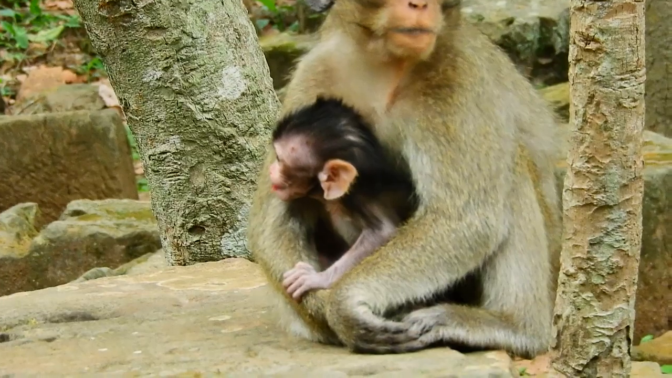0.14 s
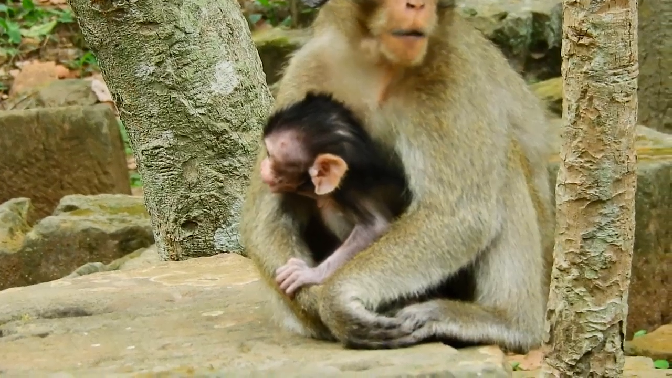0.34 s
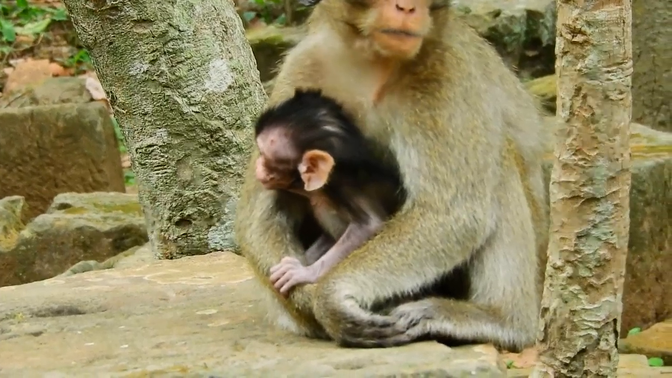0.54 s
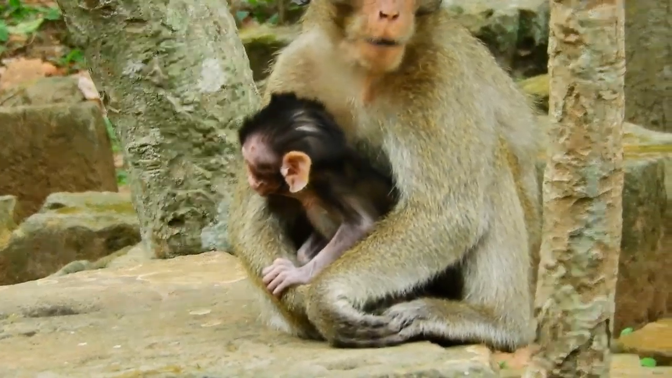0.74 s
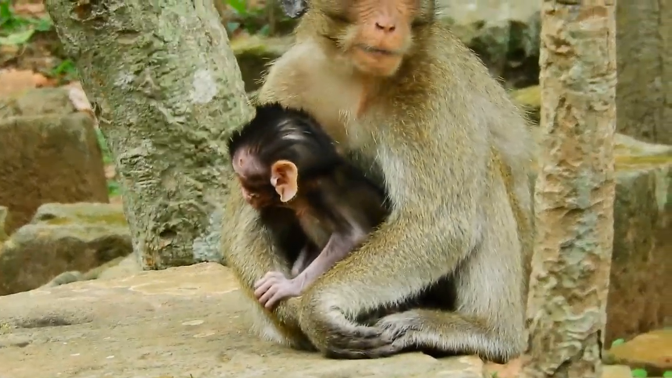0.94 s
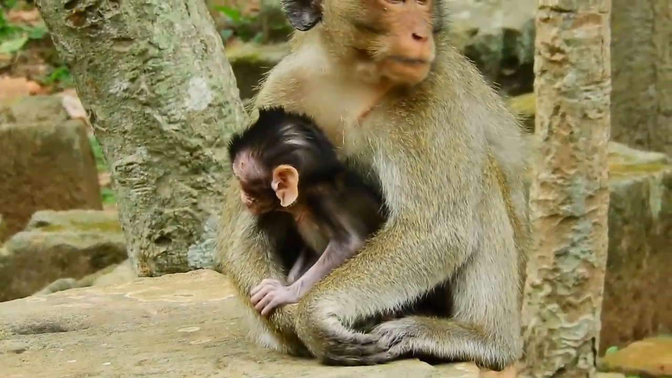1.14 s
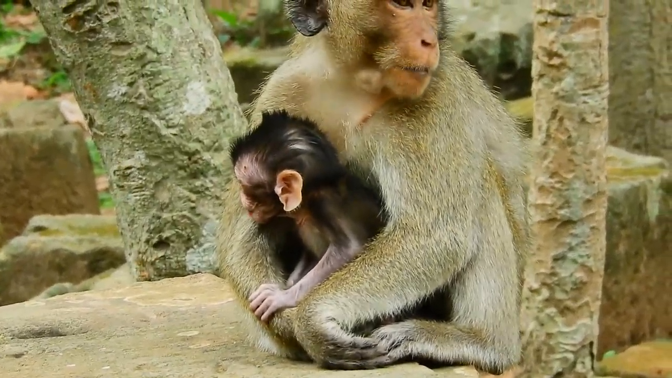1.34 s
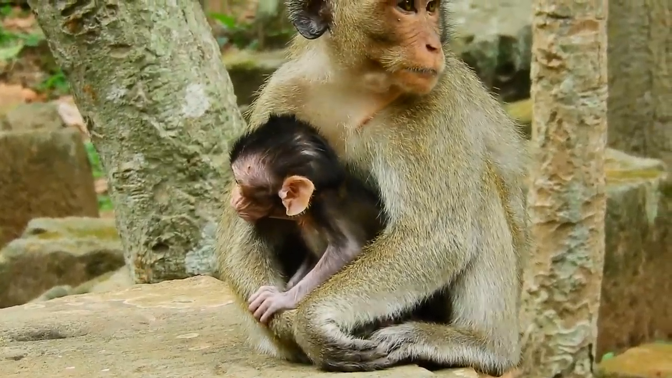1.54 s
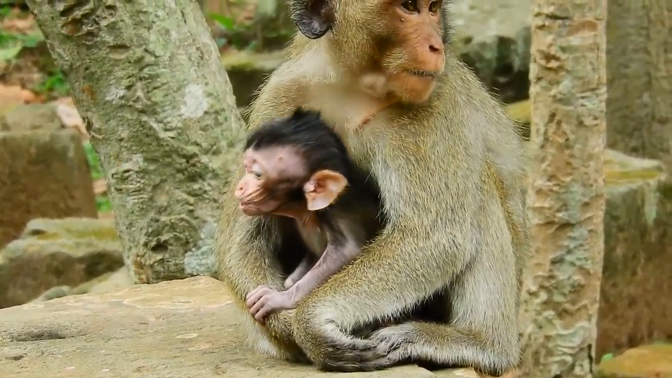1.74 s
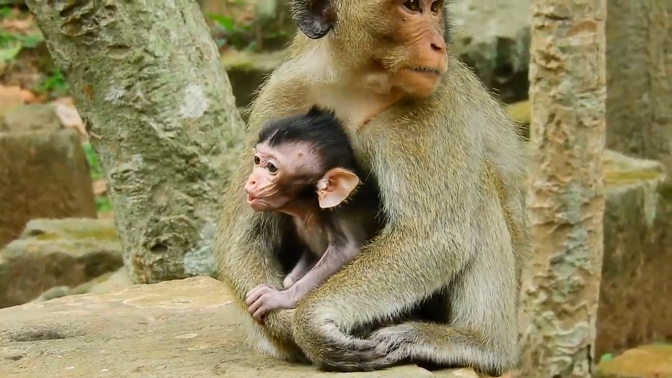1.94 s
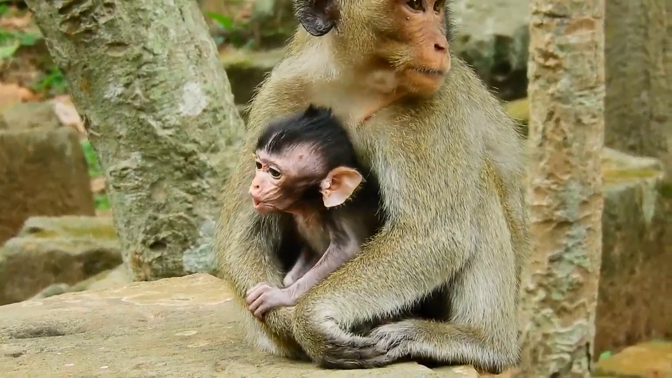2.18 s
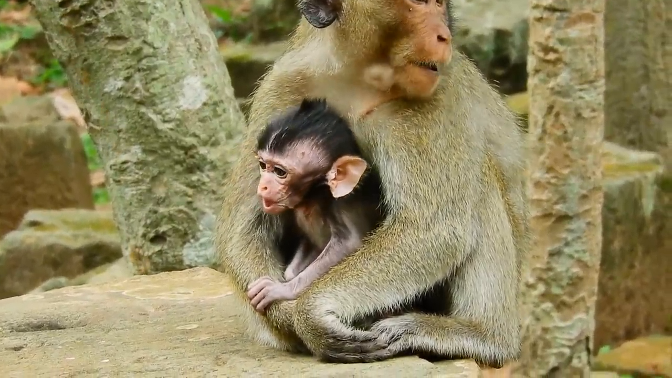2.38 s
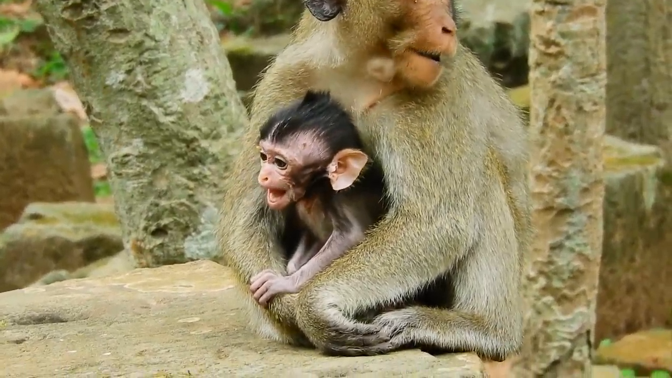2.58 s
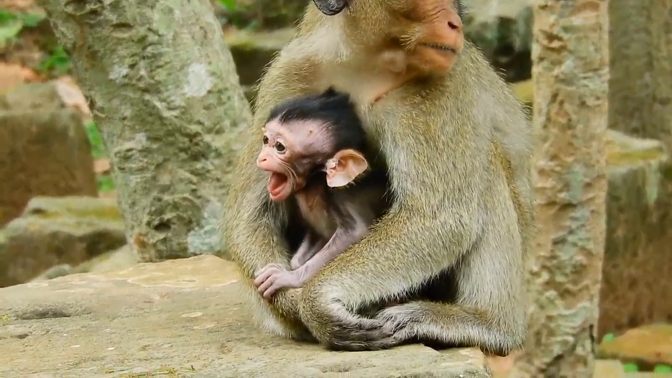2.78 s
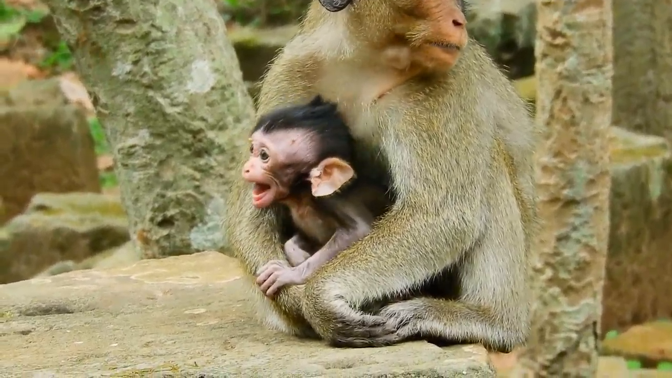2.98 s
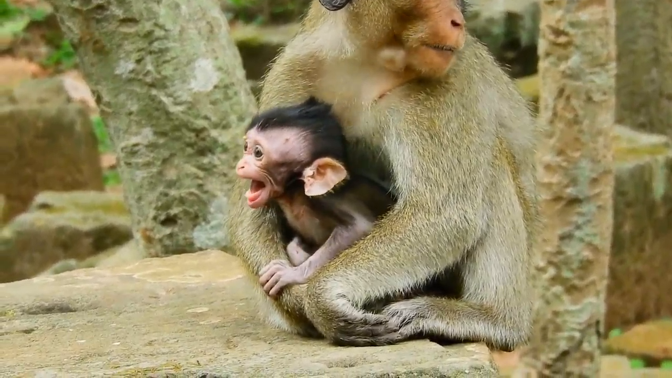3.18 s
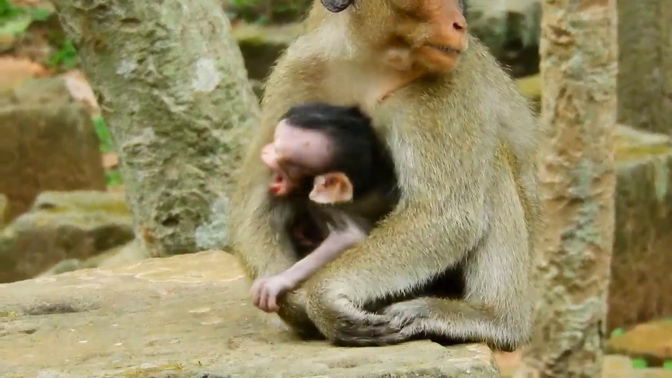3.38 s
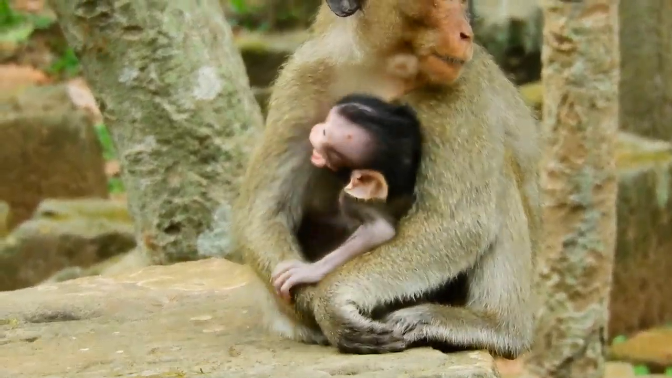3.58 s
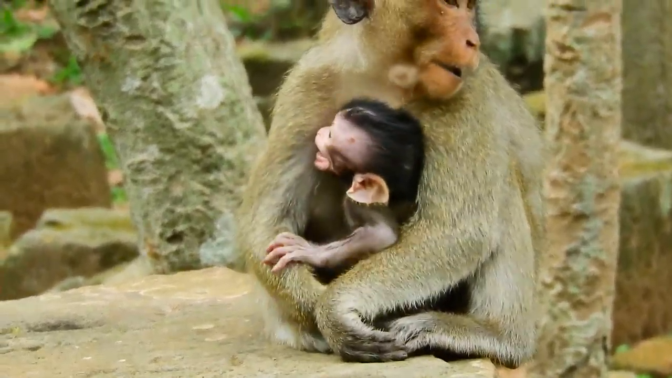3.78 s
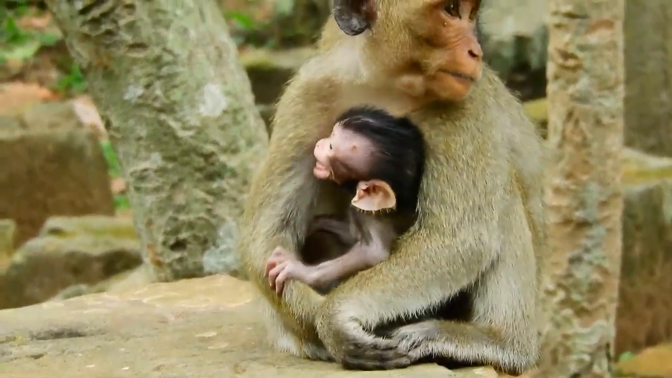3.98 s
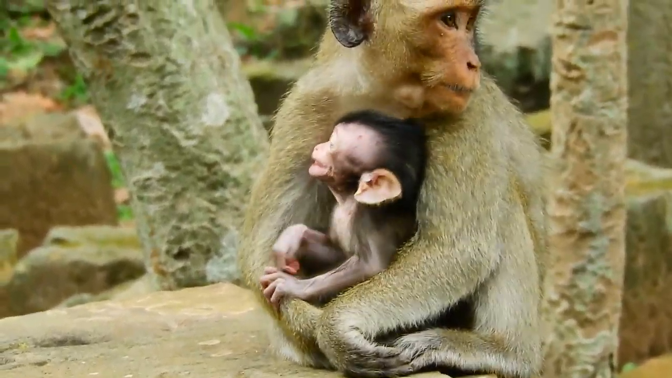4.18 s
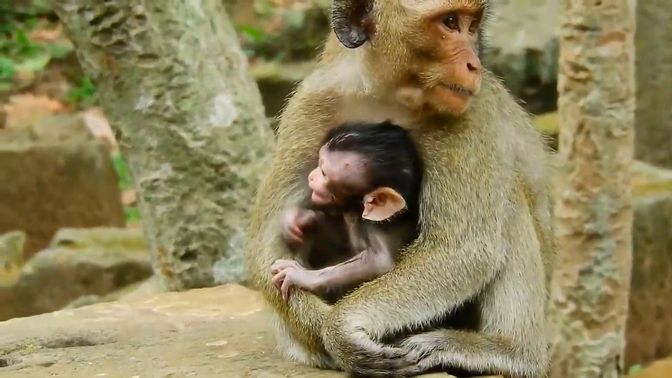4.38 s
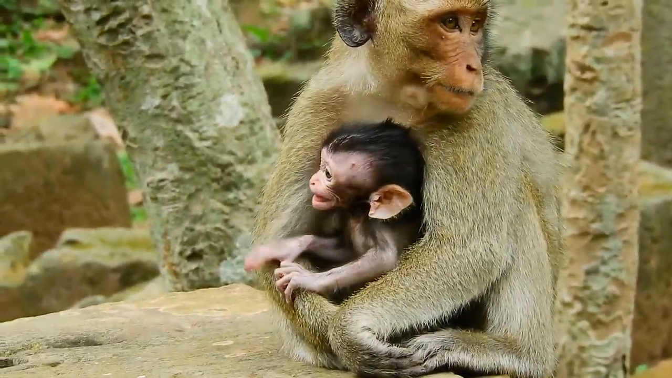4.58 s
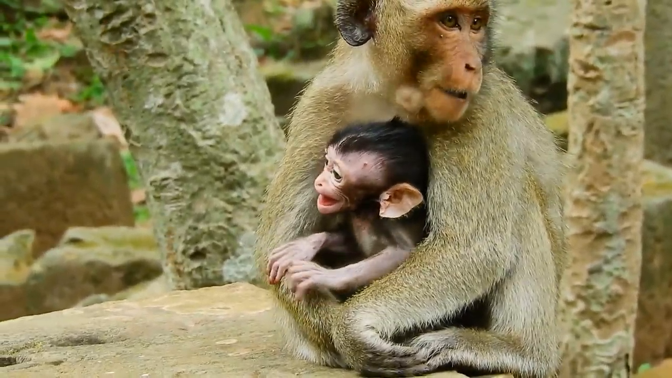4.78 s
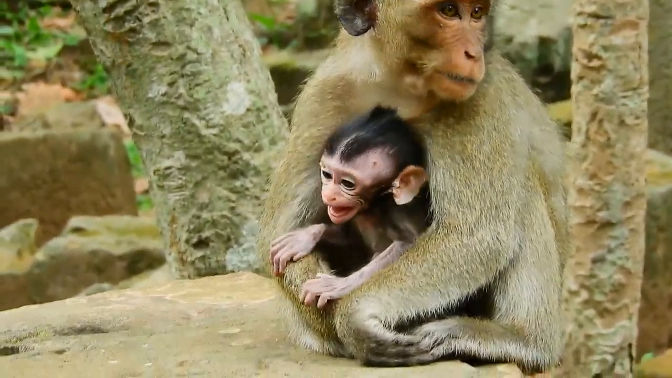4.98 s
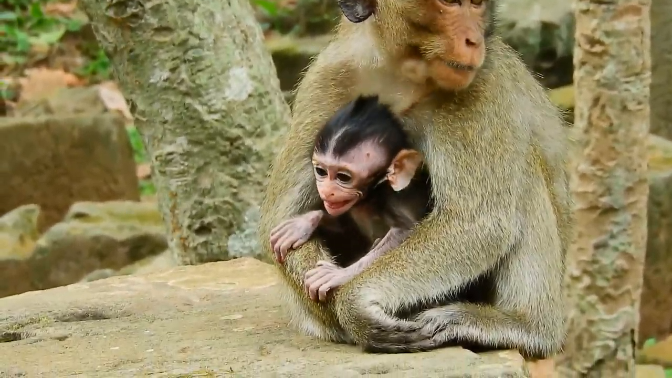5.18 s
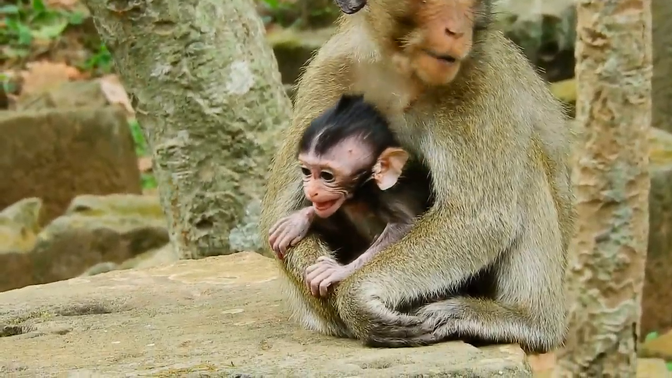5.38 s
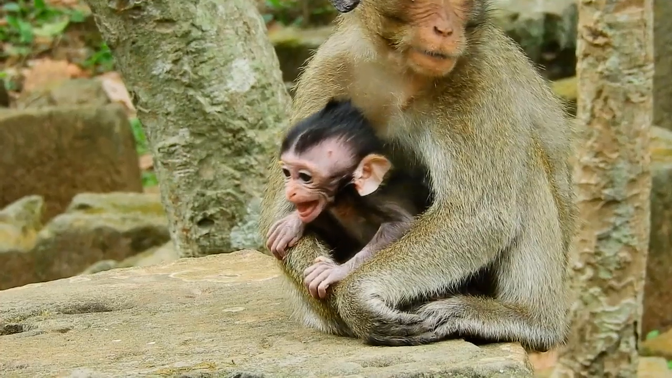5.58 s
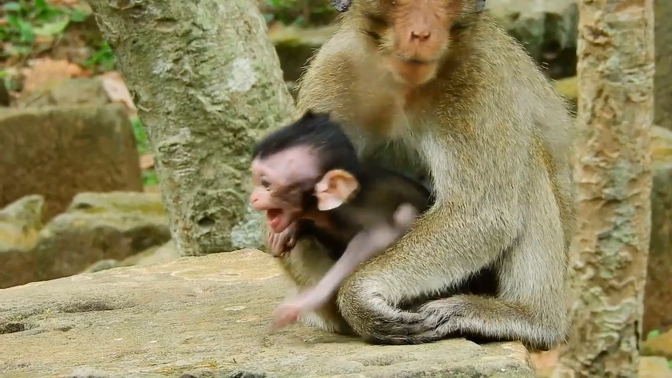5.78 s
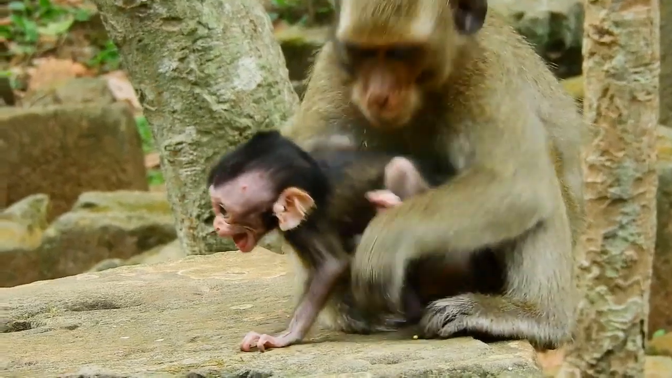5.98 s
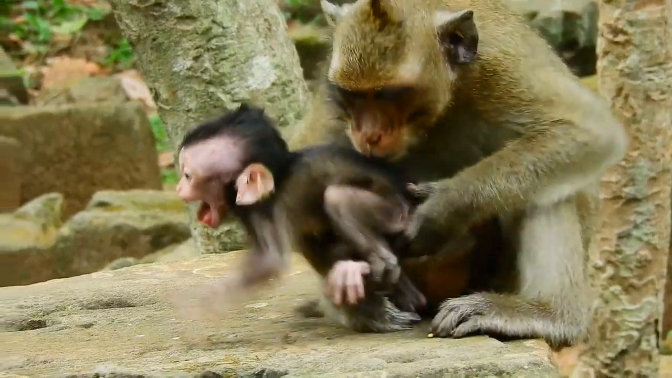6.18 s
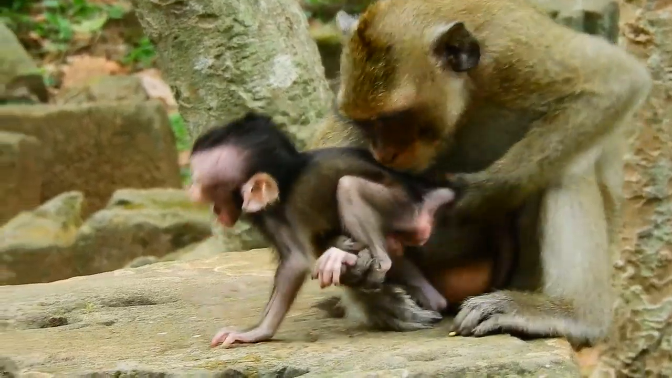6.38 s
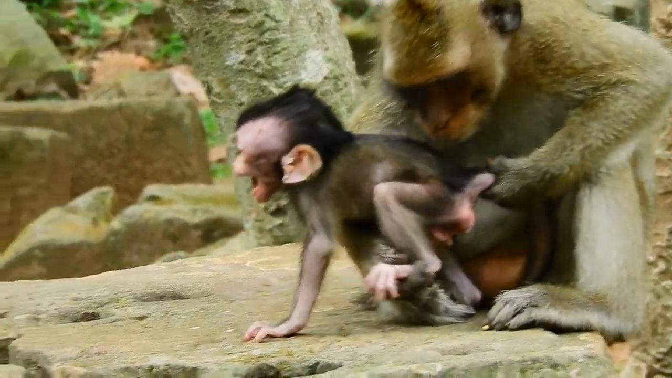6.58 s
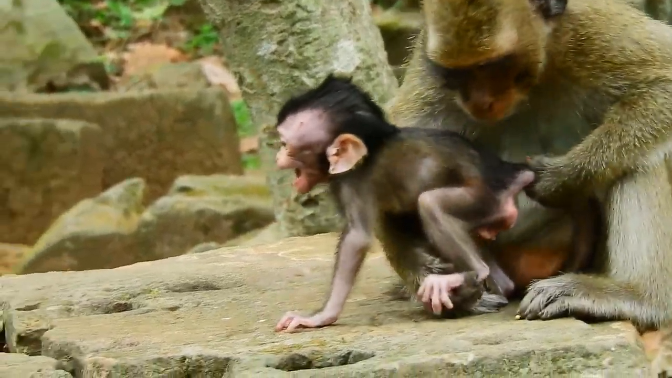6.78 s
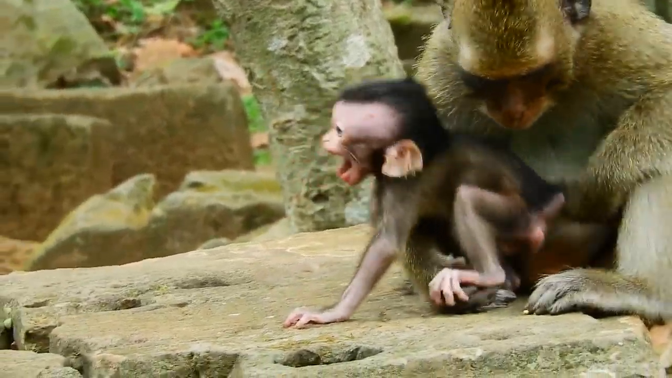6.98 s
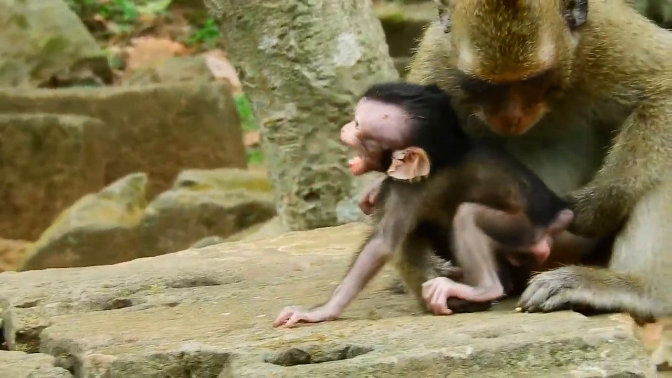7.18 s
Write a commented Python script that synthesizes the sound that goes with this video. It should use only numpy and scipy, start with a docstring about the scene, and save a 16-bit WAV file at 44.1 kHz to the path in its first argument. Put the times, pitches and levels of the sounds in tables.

```python
"""On a stone slab among trees, a newborn monkey squeals and yelps, its voice flipping between whistle and rasp.
Its voice is made of sine tones on gliding pitches, plus noise shaped by the throat.
Far off, another animal repeats a whine and some gliding whistles, made of stacked sine tones.
Leaves hiss and rustle, and wind buffets the two microphone ports: both are coloured noise with moving levels.
The trees scatter the voices back as short noisy tails."""
import sys
import numpy as np
from scipy import signal
from scipy.fft import rfft, irfft
from scipy.io import wavfile
from scipy.ndimage import uniform_filter1d

SR = 44100
rng = np.random.default_rng(int(sys.argv[2]) if len(sys.argv) > 2 else 0)


def master_out(mix):
    """Clip the mix to full scale and print it as 16-bit PCM to the path in sys.argv[1]."""
    frames = np.transpose(np.atleast_2d(mix))
    ceiling = np.clip(frames, -1, 1)
    pcm = np.round(ceiling * 32767).astype(np.int16)
    wavfile.write(sys.argv[1], SR, pcm)


N = 319284   # length in samples

# Levels in these tables are starting points: flutter and mixing change them later.
# the far whine: start t/s, length/s, pitch f/Hz, fourth partial level/dB, sixth against fourth level/dB
FAR_WHINES = [(-.07, 0.18, 884, -41.5, -7), (0.603, .19, 869, -36.5, 1.5), (1.405, 0.39, 865, -38, -1.5),
              (2.3, 0.5, 849.7, -40, -6), (3.134, 0.26, 818.6, -37.5, -11.5),
              (4.04, 0.45, 814, -39.5, -11.5), (5.409, 0.44, 810, -39.5, -8.5),
              (6.8, 0.37, 791, -44.5, -12.5)]
# low partials of the whine: multiple of the pitch, level/dB against the fourth before the dullness boost
WHINE_LOW_PARTIALS = [(2, -14), (3, -19)]
# far gliding whistles, call by call: t/s, pitch f/Hz, level/dB, octave partial level/dB
FAR_GLIDES = [
    [(1.5, 1780, -45, -70), (1.6, 2000, -39, -56), (1.68, 2060, -39, -43), (1.73, 2170, -52, -47),
     (1.8, 2250, -55, -42), (2.05, 2370, -58, -57)],
    [(3.99, 2170, -56, -75), (4.08, 2260, -50, -75)],
    [(5.61, 2450, -60, -46), (5.7, 2130, -60, -44), (5.78, 2090, -60, -50)],
    [(6.74, 2510, -40.5, -70), (6.79, 2470, -52, -75)],
]
# bursts of leaf rustle: start t/s, level/dB before rise and decay, time to fall 60 dB/s, rise time constant/s
RUSTLE_BURSTS = [(0.0294, -29, 0.52, 0.062), (0.486, -26.5, 0.32, 0.014), (0.767, -34, 0.87, 0.0078),
                 (1.003, -19.5, 0.14, 0.026), (1.722, -34, 1, 0.0051), (3.7994, -24, 0.42, 0.063),
                 (4.919, -20.5, 0.28, 0.054), (6.7002, -25, 0.32, 0.057)]
# colour of the rustles: f/Hz, relative level per Hz/dB
RUSTLE_SPECTRUM = [(500, 5), (1500, 19), (4000, 11.5), (9000, 20.5), (11500, 8), (15000, -18)]
# colour of the leaves and far rumble: f/Hz, relative level per Hz/dB
LEAF_SPECTRUM = [(20, -45), (59, -5), (129, 1), (581, -11.5), (747, -7), (1010, -7.5), (1100, -9),
                 (5550, -12), (9420, -9.5), (10800, -19.5), (15600, -40.5)]
# how alike left and right are in the foliage: f/Hz, likeness (1 same, 0 unrelated, -1 opposite)
LEFT_RIGHT_LIKENESS = [(60, 0.76), (180, 1), (550, 0.53), (1650, 0.73), (4970, 0.34), (15000, -0.32)]
# strength of the wind rumble: t/s, level/dB before its lumps
WIND_STRENGTH = [(0.0, -26.5), (0.14, -36), (0.8, -34.5), (1.11, -24), (1.23, -35.5), (1.47, -27),
                 (1.73, -40), (1.87, -30.5), (2.46, -24), (2.9, -28.5), (3.39, -26), (3.57, -20.5),
                 (4.21, -42), (4.4, -26), (4.58, -45), (5.28, -36.5), (5.57, -46.5), (5.83, -37),
                 (6.01, -47), (7.24, -45)]
# colour of the wind rumble: f/Hz, relative level per Hz/dB
WIND_SPECTRUM = [(20, -42), (80, -33), (120, -1.5), (180, 7.5), (280, -8.5), (450, -18.5), (800, -43.5),
                 (1500, -37), (4000, -69)]
# puffs of wind: start t/s, drive level/dB, left minus right level/dB
WIND_PUFFS = [(0.032, -21, 0), (0.468, -26.5, 1), (0.92, -39, -2), (1.081, -17, -2.5), (2.135, -24, -1),
              (2.438, -23, -1), (2.545, -21, -3), (2.756, -25, -3), (3.089, -20, -3), (3.171, -20, -5.5),
              (3.364, -22.5, -11.5), (3.635, -28, 3.5), (3.832, -27.5, 3)]
# long squeals, call by call: t/s, pitch f/Hz, whistle level/dB, rasp level/dB
LONG_SQUEALS = [
    [(2.455, 4915, -34, -40), (2.49, 5900, -17.5, -48), (2.533, 6060, -34.5, -45), (2.574, 6810, -24, -46),
     (2.65, 10700, -22.5, -36.5), (2.68, 9930, -24.5, -26), (2.772, 9420, -20, -33.5),
     (2.85, 9090, -10.5, -23.5), (2.877, 7710, -29, -33.5), (2.886, 6600, -51, -23.5),
     (2.91, 5700, -64, -29)],
    [(3.206, 7850, -22.5, -36), (3.234, 8750, -19, -39), (3.241, 9280, -8, -33.5),
     (3.256, 9480, -16, -23.5), (3.266, 10150, -24.5, -47), (3.288, 10340, -28, -44),
     (3.31, 10100, -24, -31.5), (3.326, 9170, -9, -27), (3.366, 9100, -14, -22), (3.375, 9400, -28, -17.5),
     (3.409, 9470, -28, -20.5)],
    [(6.079, 4500, -22, -42), (6.09, 5920, -33, -41.5), (6.099, 7000, -24, -34), (6.108, 8750, -25.5, -24),
     (6.123, 8220, -24.5, -44), (6.14, 9600, -21.5, -30), (6.165, 9300, -23, -30), (6.19, 8800, -26, -29),
     (6.215, 9250, -29, -27), (6.251, 8700, -24, -27.5), (6.295, 9110, -18, -26), (6.32, 9140, -19, -29.5),
     (6.345, 9600, -19.5, -32), (6.365, 10000, -29, -26.5), (6.379, 9180, -11, -27.5),
     (6.393, 9770, -17, -30), (6.422, 7960, -18.5, -27.5), (6.437, 5880, -34.5, -38.5)],
    [(6.872, 10160, -23, -40), (6.894, 8500, -40, -37), (6.897, 7480, -40, -27), (6.912, 6830, -45.5, -35),
     (6.924, 5150, -25.5, -36), (6.936, 6400, -35, -30.5), (6.968, 6430, -32, -30), (6.97, 8820, -26, -37),
     (6.984, 8720, -25, -25), (6.986, 6570, -33, -25.5), (7.008, 6320, -29, -26.5),
     (7.01, 8100, -29, -35.5), (7.018, 8700, -19, -31.5), (7.042, 9400, -16.5, -33),
     (7.062, 9000, -16.5, -33.5), (7.086, 10400, -19.5, -24), (7.119, 7920, -19.5, -22),
     (7.129, 5700, -20.5, -21), (7.132, 5000, -20, -38), (7.137, 4900, -26, -46)],
]
# short shrieks in the same voice: t/s, pitch f/Hz, whistle level/dB, rasp level/dB, octave against whistle level/dB
SHORT_SHRIEKS = [
    [(3.159, 5810, -24.5, -42.5, -22), (3.165, 5960, -25.5, -36, -31), (3.179, 5560, -27.5, -52.5, -8)],
    [(3.411, 4244, -30, -17, -2), (3.432, 4294, -18, -16.5, -18), (3.446, 4350, -26, -23, -25)],
    [(5.783, 6100, -30, -34, -16), (5.791, 7200, -23, -21, -20), (5.8, 8200, -17, -15, -30),
     (5.812, 8100, -24, -14, -30), (5.819, 8000, -32, -16, -30), (5.821, 5200, -31, -10, 11),
     (5.83, 4860, -21.5, -21.5, -1), (5.838, 4250, -28.5, -34, -5)],
    [(5.868, 5020, -14, -15.5, -17), (5.875, 4890, -26.5, -22, -17), (5.886, 4360, -23, -19.5, -15.5),
     (5.898, 4760, -25, -25, -20), (5.908, 4570, -28.5, -32, -18.5)],
]
# throat resonances: centre f/Hz, width f/Hz, height level/dB
THROAT_RESONANCES = [(3160, 1100, 4), (4670, 1000, 3), (6060, 2100, 0), (9430, 2340, 6.5),
                     (12700, 1000, -7)]
# short yelps, call by call: t/s, pitch f/Hz, fundamental level/dB, third partial level/dB, rasp level/dB
YELP_CALLS = [
    [(4.4, 3160, -50, -48, -62.5), (4.407, 3520, -53, -47, -61), (4.417, 3460, -62, -58, -65)],
    [(4.656, 2520, -60, -42.5, -65), (4.663, 2785, -63.5, -35, -65), (4.674, 2556, -45, -57, -59.5),
     (4.697, 1725, -41, -70, -57)],
    [(4.854, 2577, -35, -30.5, -37), (4.862, 3023, -37, -20, -37.5), (4.875, 2850, -37.5, -30.5, -28.5),
     (4.903, 2527, -42.5, -40, -33)],
    [(5.196, 3250, -25.5, -30, -47), (5.204, 3380, -25.5, -30, -35.5), (5.222, 3017, -32.5, -23.5, -31.5),
     (5.241, 1915, -39, -40.5, -38)],
    [(5.296, 2577, -41, -59, -39.5), (5.306, 2817, -32.5, -47, -33), (5.322, 2740, -45, -60, -48)],
    [(5.503, 2550, -28.5, -35, -39), (5.515, 3250, -32, -22.5, -30.5), (5.525, 3560, -24, -34.5, -31),
     (5.536, 2927, -29, -21.5, -33), (5.547, 2355, -37.5, -50, -53.5)],
    [(5.575, 2800, -34.5, -46, -40), (5.59, 2765, -33.5, -46, -28.5), (5.606, 2700, -38.5, -59, -48)],
]

# whine levels at its start and end, and the sixth partial's quicker fade
WHINE_ONSET_DB, WHINE_FADE_DB, SIXTH_FADE_DB = -8, -11, -34
WHINE_FLAT, WHINE_RISE_S, WHINE_HOLD_S = .1, 0.067, 0.11   # starts flat by this share, steps up, holds
WHINE_DULL = .7          # dB gained by the low partials per dB lost by the sixth
LEAVES_DB = -41          # middle level of the steady hiss
SQUEAL_OCTAVE_DB = -11   # octave against the whistle in long squeals, before the throat colours it
SLAP_HZ = 850            # middle rate of the slow slaps in the low register
UNDERTONE = .76          # a noisy band rides below the whistle at this share of its pitch
PORT_LAG_S = 1.1e-5      # the infant reaches the left port this much later
CUTOFF_HZ = 15700        # top of the final sound


def amp(db):
    """Turn decibels into a plain multiplier."""
    return 10 ** (np.asarray(db) / 20)


def rms_one(x):
    """Scale a signal to an average strength of 1."""
    return x / np.sqrt(np.mean(x ** 2) + 1e-20)


def in_time(rows):
    """Draw straight lines between table rows, giving each column a value per sample."""
    s, *columns = np.array(sorted(rows, key=lambda row: row[0])).T
    return [np.interp(np.arange(N) / SR, s, column) for column in columns]


def phrases(tables, fade_s):
    """A soft-edged gate that is open during each table, and the joined columns."""
    gate = np.zeros(N)
    for rows in tables:
        start = max(0, round(rows[0][0] * SR))
        end = round((rows[-1][0] + fade_s) * SR)
        gate[start:end] = 1
    gate = uniform_filter1d(gate, size=max(3, round(fade_s * SR)))
    return gate, *in_time([row for rows in tables for row in rows])


def at_hz(points, hz):
    """Read a frequency table at any pitch, along a logarithmic scale."""
    table_hz, values = np.array(points).T
    return np.interp(np.log(hz), np.log(table_hz), values)


def drift(hz):
    """Random wandering: noise smoothed twice by a one-pole low-pass at this rate; spread 1."""
    r = np.exp(-2 * np.pi * hz / SR)
    noise = rng.standard_normal(N + SR)
    return rms_one(signal.lfilter([1], [1, -2 * r, r * r], noise)[SR:])   # the first second settles


def coloured(x, spectrum):
    """Shape a sound by a spectrum; rms 1."""
    hz = np.maximum(np.fft.rfftfreq(N, 1 / SR), 1)
    return rms_one(irfft(rfft(x) * amp(at_hz(spectrum, hz)), N))


def whine_tables():
    """Each whine starts flat, steps up, holds, then fades as it creeps up; a weak sixth brings strong low ones."""
    tables = []
    for s, length, hz, db, sixth_against_db in FAR_WHINES:
        sixth_db = db + sixth_against_db
        risen = s + WHINE_RISE_S
        shape = [
            (s, hz * (1 - WHINE_FLAT), db + WHINE_ONSET_DB, sixth_db + 2 * WHINE_ONSET_DB),
            (s + .7 * WHINE_RISE_S, hz * (1 - .6 * WHINE_FLAT), db + WHINE_ONSET_DB / 2, sixth_db + WHINE_ONSET_DB),
            (risen, hz * 1.012, db + 2.0, sixth_db),
            (risen + WHINE_HOLD_S, hz, db, sixth_db - 3),
            (s + length, hz * 1.025, db + WHINE_FADE_DB, sixth_db + SIXTH_FADE_DB)]
        tables.append([(*row, -WHINE_DULL * sixth_against_db) for row in shape])
    return tables


def far_whine():
    """A stack of exact multiples of one wavering pitch, strongest at the fourth, sixth and low partials."""
    gate, hz, db, sixth_db, dull_db = phrases(whine_tables(), fade_s=0.025)
    phase = 2 * np.pi * np.cumsum(hz * (1 + .011 * drift(25) + .009 * drift(200))) / SR
    low = sum(amp(order_db + dull_db) * np.sin(k * phase) for k, order_db in WHINE_LOW_PARTIALS)
    flutter = amp(3.5 * drift(25))
    return gate * flutter * (amp(db) * (low + np.sin(4 * phase)) + amp(sixth_db) * np.sin(6 * phase))


def far_glides():
    """Gliding whistles: one wavering tone and its octave."""
    gate, hz, db, octave_db = phrases(FAR_GLIDES, fade_s=0.0088)
    phase = 2 * np.pi * np.cumsum(hz * (1 + 0.00616 * drift(24.4) + 0.0038 * drift(290))) / SR
    flutter = np.sqrt(2) * amp(2.6 * drift(28))
    return gate * flutter * (amp(db) * np.sin(phase) + amp(octave_db) * np.sin(2 * phase))


def trees(x, t60, onset_s, blur_hz):
    """Trunks and moving leaves scatter sound back as a dying noise, blurred in pitch, other on each side."""
    x = x * drift(blur_hz)
    t = np.arange(round(.8 * SR)) / SR
    tail = rng.standard_normal((2, len(t))) * amp(-60 * t / t60) * (1 - np.exp(-t / onset_s))
    tail = tail / np.sqrt(np.sum(tail ** 2) / 2)
    return signal.fftconvolve(x[None], tail, axes=1)[:, :N]


def stereo_noise(spectrum):
    """A shared and an opposed noise, mixed to set the left-right likeness at each frequency; rms 1."""
    hz = np.maximum(np.fft.rfftfreq(N, 1 / SR), 1)
    alike = np.clip(at_hz(LEFT_RIGHT_LIKENESS, hz), -1, 1)
    mid, side = rfft(rng.standard_normal((2, N)))
    both = np.sqrt(1 + alike) * mid + np.sqrt(1 - alike) * side * [[1], [-1]]
    return coloured(irfft(both, N), spectrum)


def foliage():
    """Many leaves make a steady, slightly wavering hiss; rustles swell fast and die away."""
    t, swell = np.arange(N) / SR, np.zeros(N)
    for s, db, t60, rise_s in RUSTLE_BURSTS:
        since = np.maximum(t - s, 0)
        swell += amp(db - 60 * since / t60) * (1 - np.exp(-since / rise_s))
    hiss = amp(LEAVES_DB + 1.72 * drift(11.7)) * stereo_noise(LEAF_SPECTRUM)
    return hiss + swell * amp(0.94 * drift(92)) * stereo_noise(RUSTLE_SPECTRUM)


def wind():
    """Eddies at each port give lumpy rumble; buffets are short, brighter puffs."""
    own_lumps = np.array([drift(22), drift(22)])
    lumps = amp(np.clip(5.5 * own_lumps + 3.5 * drift(15), -10, 8))   # the last part is shared by both ports
    rumble = amp(in_time(WIND_STRENGTH)[0]) * coloured(rng.standard_normal((2, N)), WIND_SPECTRUM) * lumps
    t, puffs = np.arange(N) / SR, np.zeros((2, N))
    for s, drive_db, pan_db in WIND_PUFFS:
        since = np.maximum(t - s, 0) / 0.018   # each puff is strongest after 18 ms
        puffs += amp(drive_db + np.array([[.5], [-.5]]) * pan_db) * since * np.exp(-since)
    puff_band = signal.butter(2, [180, 550], "band", fs=SR, output="sos")
    puff_noise = signal.sosfilt(puff_band, rng.standard_normal((2, N)))
    return rumble + puffs * rms_one(puff_noise)


def throat_gain(hz):
    """Height of the throat resonances, added in power."""
    power = 0
    for top_hz, width_hz, db in THROAT_RESONANCES:
        power = power + amp(db) ** 2 / (1 + (2 * (hz - top_hz) / width_hz) ** 2) ** 2
    return np.sqrt(power)


def rasp_noise(low_hz, top_hz, dip_db, patchy_db, slaps_db):
    """Chaotic folds: noise in narrow throat bands that flare one by one, chopped by irregular slaps; rms 1."""
    hz, out = np.fft.rfftfreq(N, 1 / SR), 0
    shape = throat_gain(hz) / (1 + (low_hz / (hz + 1)) ** 12) / (1 + (hz / top_hz) ** 12)
    shape *= amp(dip_db * np.exp(-((hz - 5900) / 600) ** 2))   # a hollow in the throat's colour
    chopped = rfft(rng.standard_normal(N) * amp(slaps_db * drift(900))) * shape
    for centre in np.arange(2100, 14000, 700):
        band = np.clip(1 - abs(hz - centre) / 700, 0, 1)
        out = out + amp(patchy_db * drift(45)) * irfft(chopped * band, N)
    return rms_one(out)


def folds(hz, voiced_db, rasp_db, jitter, wobble):
    """Phase and flutter of the vocal folds: the more rasp, the less steady their pitch and strength."""
    unsteady = 1 / (1 + amp(1.6 * (voiced_db - rasp_db - 5)))   # 0 steady, 1 wild
    hz = hz * (1 + unsteady * (jitter * drift(400) + wobble * drift(50)))
    flutter = np.sqrt(2) * amp(np.minimum((2 + 8 * unsteady) * drift(150), 4))
    return 2 * np.pi * np.cumsum(hz) / SR, flutter


def squeals():
    """A near-pure whistle with its octave, noisy bands that ride on and under it, and rasp."""
    long_calls = [[(*row, SQUEAL_OCTAVE_DB) for row in rows] for rows in LONG_SQUEALS]
    gate, hz, whistle_db, rasp_db, octave_db = phrases(long_calls + SHORT_SHRIEKS, fade_s=0.003)
    # 1 in the high register; lower down the voice is harsher and its rasp deeper
    high = np.minimum(hz / 8500, 1) ** 3
    phase, flutter = folds(hz, whistle_db, rasp_db, jitter=.035 + .01 * (1 - high), wobble=.018)
    # the octave is left out where it would pass a third of the sample rate
    octave = amp(octave_db) * throat_gain(2 * hz) / throat_gain(hz) * (hz < SR / 6)
    whistle = amp(whistle_db) * flutter * (np.sin(phase) + octave * np.sin(2 * phase))
    # low down, slower slaps split the tone into stacked bands
    slaps = np.cos(2 * np.pi * np.cumsum(SLAP_HZ * (1 + .08 * drift(60))) / SR)
    whistle += amp(rasp_db - 1) * (1 - high) ** 2 * slaps * np.sin(phase)
    # breath noise beats on the tone
    breath = uniform_filter1d(drift(1400), size=11) * amp(3 * drift(150))
    halo = amp(rasp_db - 2.5) * high * breath * np.cos(phase)
    under_noise = uniform_filter1d(drift(500), size=25) * amp(5 * drift(90))
    under = amp(rasp_db - 9) * high * under_noise * np.cos(UNDERTONE * phase)
    deep_noise = rasp_noise(low_hz=3100, top_hz=4400, dip_db=0, patchy_db=4, slaps_db=2)
    deep = amp(rasp_db - 16) * (1 - high) ** 3 * deep_noise
    rasp = amp(rasp_db - 6) * rasp_noise(low_hz=4100, top_hz=13500, dip_db=0, patchy_db=5, slaps_db=3.5)
    return gate * (whistle + halo + under + deep + rasp)


def yelps():
    """Lower, rougher barks: the throat favours the first and third partials."""
    gate, hz, first_db, third_db, rasp_db = phrases(YELP_CALLS, fade_s=0.0034)
    phase, flutter = folds(hz, np.maximum(first_db, third_db), rasp_db, jitter=.08, wobble=.02)
    fourth = amp(-14) * throat_gain(4 * hz) / throat_gain(3 * hz)   # against the third partial
    voiced = amp(first_db) * np.sin(phase) + amp(third_db) * (np.sin(3 * phase) + fourth * np.sin(4 * phase))
    rasp = rasp_noise(low_hz=2000, top_hz=11500, dip_db=-7, patchy_db=3.5, slaps_db=1.5)
    return gate * (flutter * voiced + amp(rasp_db) * rasp)


def scene():
    """Place the infant between the ports, then add the far animal, the scattering trees, leaves and wind."""
    near = squeals() + yelps()
    far = far_whine() + far_glides()
    hz = np.fft.rfftfreq(N, 1 / SR)
    late = irfft(rfft(near) * np.exp(-2j * np.pi * hz * PORT_LAG_S), N)
    voices = np.array([late, near]) * amp([[-.7], [.7]])   # the infant is a little nearer the right port
    voices += amp(-8) * trees(near, t60=0.4, onset_s=0.0007, blur_hz=387)
    voices += amp(-3) * far + amp(-3) * trees(far, t60=1.0, onset_s=.012, blur_hz=150)
    return voices + foliage() + wind()


def record(dry):
    """A steep low-pass removes the very top of the treble."""
    return signal.sosfilt(signal.ellip(10, .5, 70, CUTOFF_HZ, fs=SR, output="sos"), dry)


dry = scene()
out = record(dry)
master_out(out)
```